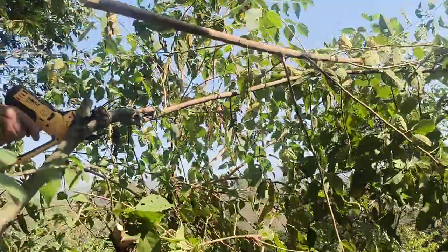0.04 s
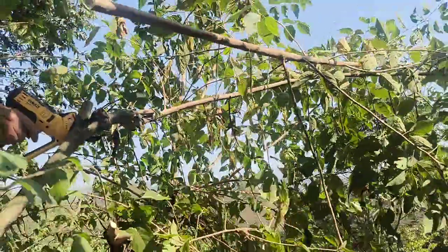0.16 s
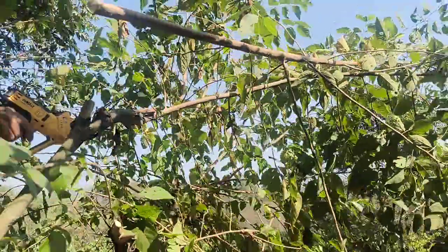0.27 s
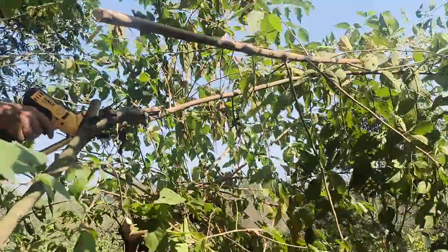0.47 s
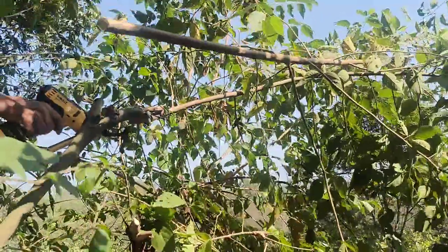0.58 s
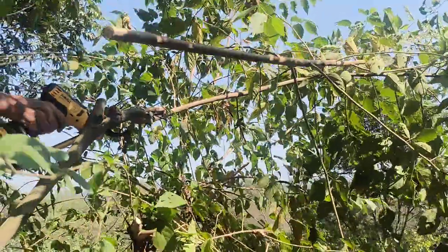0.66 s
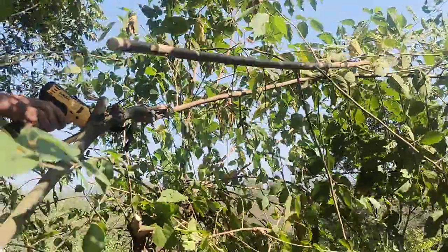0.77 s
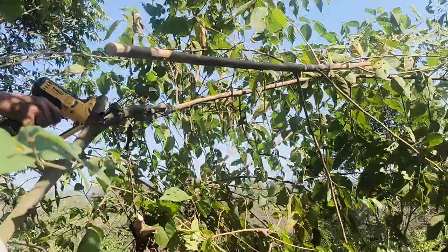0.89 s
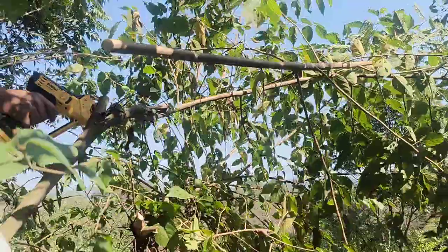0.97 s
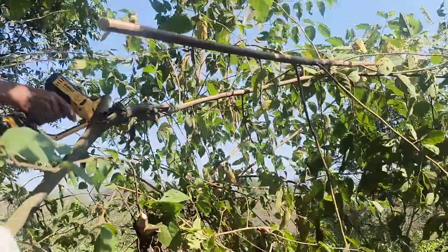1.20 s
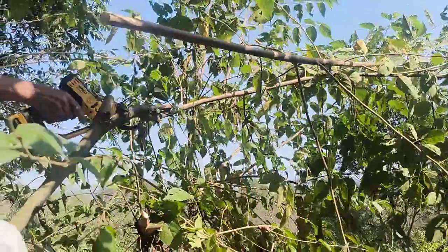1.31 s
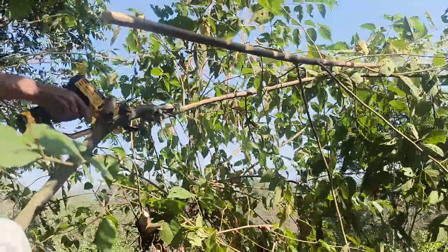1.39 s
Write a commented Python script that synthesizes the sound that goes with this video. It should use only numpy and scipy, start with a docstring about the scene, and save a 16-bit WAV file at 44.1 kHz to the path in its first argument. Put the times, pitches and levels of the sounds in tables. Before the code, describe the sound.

Battery pruning shears whir close by in quiet outdoor air, first fast and ending in a clack, then slower and buzzier. Before that, leaves rustle, a loud crunch rubs the microphone's right side, and a twig snaps among small clicks.

```python
"""A cordless pruner works on a thin branch among leaves, close to a hand-held camera.
First leaves rustle over quiet outdoor air, with a faint whine. Then something scrapes over the
right microphone opening with a loud crunch. A few small clicks follow, and a twig snaps.
Last, the geared motor whirs twice: it spins up, brakes with a clack, and runs again more slowly."""
import sys
import numpy as np
from scipy.fft import rfft, irfft, next_fast_len
from scipy.io import wavfile
from scipy.ndimage import uniform_filter1d, map_coordinates

SR = 44100
rng = np.random.default_rng(int(sys.argv[2]) if len(sys.argv) > 2 else 0)


def pcm_store(signal):
    """Save signal as 16-bit PCM."""
    levels = np.round(np.clip(np.atleast_2d(signal), -1, 1) * 32767)
    wavfile.write(sys.argv[1], SR, levels.astype(np.int16).T)


N = 63945
TOP_HZ = 15800  # the highest pitch the camera keeps


def amp(db):
    return 10 ** (np.asarray(db) / 20)


def unit(x):
    return x / np.sqrt(np.mean(x ** 2) + 1e-20)


def along(points, hz):
    """Read between the rows of a (pitch_hz, value) table, on a log pitch scale."""
    pitches, values = np.transpose(points)
    return np.interp(np.log(hz + 1), np.log(pitches + 1), values)


def curves(rows):
    """A gate that is open from the first row to the last, then each column as a curve in time."""
    times, *columns = np.transpose(rows)
    t = np.arange(N) / SR
    gate = uniform_filter1d(((t >= times[0]) & (t <= times[-1])) * 1., size=200)
    return [gate] + [np.interp(t, times, column) for column in columns]


def wobble(rate):
    """A smooth curve through `rate` random values a second."""
    return map_coordinates(rng.standard_normal(int(N * rate / SR) + 4), [np.arange(N) * rate / SR])


def filtered(x, response):
    """Multiply each frequency in x by response(hz)."""
    size = next_fast_len(N + SR // 2)
    return irfft(rfft(x, size) * response(np.fft.rfftfreq(size, 1 / SR)), size)[..., :N]


def coloured(x, spectrum):
    """Shape x with a (pitch_hz, level_db) table, then set its average (rms) level to 1."""
    return unit(filtered(x, lambda hz: amp(along(spectrum, hz))))


def sides(db):
    """Left and right gains that make the left louder by db."""
    return amp(np.array([np.atleast_1d(db), -np.atleast_1d(db)]) / 2)


def arrive(x, lead_s):
    """One sound at both microphones, the left earlier by lead_s."""
    return filtered(x, lambda hz: np.exp(1j * np.pi * hz * lead_s * np.array([[1], [-1]])))


def grains(rate, spread_db, hiss_db):
    """Tiny slips of random size, `rate` a second, over a hiss; each side has its own."""
    signs = (rng.random((2, N)) < rate / SR) * rng.choice([-1, 1], (2, N))
    sizes = amp(spread_db * np.minimum(rng.exponential(size=(2, N)), np.pi))
    return unit(signs * sizes) + amp(hiss_db) * rng.standard_normal((2, N))


def knock(start_s, fade_s, gain, size=8192):
    """A hit with a rattle that falls 60 dB in fade_s, shaped by gain(hz); peak 1 on each side."""
    t = np.arange(size) / SR
    # build a filter that rings only after the hit, never before
    cepstrum = irfft(np.log(np.maximum(gain(np.fft.rfftfreq(size, 1 / SR)), 1e-6)))
    cepstrum[1:size // 2] *= 2
    cepstrum[size // 2 + 1:] = 0
    push = rng.standard_normal((2, size)) * np.exp(-np.log(1000) * t / fade_s)
    push[:, 0] += 7  # the hit itself
    ring = irfft(rfft(push) * np.exp(rfft(cepstrum)))
    ring /= abs(ring).max(axis=1, keepdims=True)
    return np.pad(ring, ((0, 0), (round(start_s * SR), N)))[:, :N]


# Tone colour of the air: pitch_hz, level_db
AIR_COLOUR = [(25, 0.5), (60, -2.5), (200, -10), (470, -18), (800, -5.5), (1400, -12), (3000, -3),
              (6000, -11), (8500, -18), (16000, -25)]
def outdoor_air():
    """A quiet, steady hush, partly the same in both ears."""
    return amp(-56) * coloured(rng.standard_normal((2, N)) + 0.62 * rng.standard_normal(N), AIR_COLOUR)


# Path of the whine: time_s, pitch_hz, level_db
WHINE_PATH = [(.02, 2400, -65), (.14, 3370, -52), (.16, 3424, -46), (.19, 3430, -45.5), (.22, 2970, -57)]
def faint_whine():
    """A thin, unsteady whine rises and sags before the crunch."""
    gate, hz, db = curves(WHINE_PATH)
    level = gate * amp(db + 3.2 * wobble(121.0))
    phase = 2 * np.pi * np.cumsum(hz * (1 + 0.038 * wobble(593))) / SR
    return level * np.sqrt(2) * np.sin(phase)


# Loudness of the rustle: time_s, level_db, right_extra_db
RUSTLE_LEVELS = [(0, -49.5, 0), (.02, -42.5, 2), (.04, -50.5, 3.5), (.1, -46.5, 4), (.18, -44.5, 7),
                 (.28, -40, 13.5), (.35, -41, 3.5), (.39, -38, 1), (.402, -32, 3), (.44, -40, 5.5),
                 (.48, -43.5, 4), (.51, -50, -0.5), (.55, -54, -3), (.565, -41, -4), (.605, -51.5, -3),
                 (.635, -40, -3.5), (.68, -55.5, -2), (.75, -69, 3), (.8, -40, 2)]
# Tone colour of the leaves: pitch_hz, level_db
LEAF_COLOUR = [(100, -37), (400, -13), (700, -12.5), (1100, -1.5), (2000, 2), (3200, 0.5), (3900, -10),
               (5300, -1), (6100, -8), (7100, -11), (8400, -20.5), (10300, -18.5), (11400, -12.5),
               (12500, -17.5), (16000, -20.5)]
# How that colour changes on the right: pitch_hz, right_extra_db
LEAF_RIGHT_COLOUR = [(200, 14), (1200, -9), (3000, -0.5), (4100, 6.5), (5400, -6.5), (8000, -3.5),
                     (12500, -2.5)]
def foliage():
    """Leaves and bark slide over each other in small clumps of slips."""
    def slips():
        clumps = grains(rate=2500, spread_db=4.5, hiss_db=-3.0) * amp(1.54 * wobble(130.5))
        return coloured(clumps, LEAF_COLOUR)
    gate, db, right_db = curves(RUSTLE_LEVELS)
    shared = arrive(slips()[0], lead_s=-0.000323)  # reaches the right side first
    left, right = np.sqrt(0.3) * shared + np.sqrt(0.7) * slips()
    right = filtered(right, lambda hz: amp(along(LEAF_RIGHT_COLOUR, hz)))
    return gate * amp(db) * np.array([left, right * amp(right_db)])


# Loudness of the scrape: time_s, level_db
SCRAPE_LEVELS = [(.185, -59), (.216, -28), (.229, -16.5), (.245, -19.5), (.262, -14.5), (.29, -14.5),
                 (.315, -15.5), (.328, -21.5), (.345, -43), (.385, -46), (.398, -33.5), (.51, -49)]
# Tone colour of the scrape: pitch_hz, level_db
SCRAPE_COLOUR = [(18, -48), (30, -9.5), (134, -4.5), (230, -9), (480, -4.5), (900, -3.5), (1460, -7.5),
                 (3140, -3.5), (5450, -15.5), (7670, -36.5), (11700, -25), (16000, -34.5)]
# Soft bumps on the microphone: start_s, peak_db, fade_s
MIC_BUMPS = [(0.054, -32.5, 0.025), (0.208, -26, 0.033), (.227, -19.5, 0.055), (0.264, -15, 0.034),
             (.361, -37, 0.065), (0.391, -20, 0.089)]
# Tone colour of a bump: pitch_hz, level_db
BUMP_COLOUR = [(20, -10.5), (140, -6), (350, -16.5), (800, -23), (5000, -63)]
def microphone_scrape():
    """Something rubs and bumps on the right microphone opening; the left barely hears it."""
    gate, db = curves(SCRAPE_LEVELS)
    slips = grains(rate=4000, spread_db=2.2, hiss_db=-2)[1] * amp(wobble(204.3))
    crunch = gate * amp(db) * coloured(slips, SCRAPE_COLOUR)
    bumps = sum(amp(peak_db) * knock(start_s, fade_s, lambda hz: amp(along(BUMP_COLOUR, hz)))[1]
                for start_s, peak_db, fade_s in MIC_BUMPS)
    return (crunch + bumps) * np.array([[amp(-45)], [1]])


# Twig, trigger and gear clicks: start_s, peak_db, pitch_hz, width_octaves, fade_s, left_extra_db
CLICK_HITS = [(0.3732, -27.5, 1870, 0.57, 0.017, 0), (.392, -22.5, 2700, 0.48, 0.045, -5),
              (0.5552, -27, 2740, 0.51, 0.029, 3), (.616, -33.5, 933, 0.46, 0.0091, 6),
              (.7655, -34, 2710, 0.54, 0.0015, 23), (.7815, -26, 820, 0.45, 0.032, 2.5),
              (1.0165, -18, 4970, 0.58, 0.02, 6), (1.028, -19, 2880, 1.05, 0.12, 1.5)]
def clicks():
    """Each click rings briefly in a broad band around its pitch."""
    sound = np.zeros((2, N))
    for start_s, peak_db, pitch_hz, width, fade_s, left_db in CLICK_HITS:
        band = lambda hz: (1 + (np.log2((hz + 1) / pitch_hz) / width) ** 2) ** -1.4
        sound += amp(peak_db) * sides(left_db) * knock(start_s, fade_s, band)
    return sound


def twig_snap(treble_hz=7000):
    """One twig breaks with a crisp, high crack."""
    treble = lambda hz: hz ** 2 / (hz ** 2 + treble_hz ** 2)
    return amp(-27.5) * knock(start_s=0.5558, fade_s=0.055, gain=treble)


def drive_tone(run, pitch_hz=4020):
    """At part speed the motor's drive chops its current and sings at one steady pitch."""
    gate, _, level_db = curves(run)
    return gate * amp(level_db - 11) * np.sqrt(2) * np.sin(2 * np.pi * pitch_hz * np.arange(N) / SR)


# Low ring of the gearbox: pitch_hz, level_db
GEARBOX_COLOUR = [(280, -28.5), (520, -1.5), (860, 1.5), (1120, 2.5), (2000, -38)]
def chirp_and_growl(speed, angle, acceleration, slack_hz=167):
    """The gears chirp at three times the motor speed; below slack_hz they run loose and growl."""
    push_db = np.where(acceleration > 0, 0.5, -1)  # speeding up, or braking
    chatter_db = 3 * wobble(250)
    chirp = np.sqrt(2) * amp(push_db + along(GEARBOX_COLOUR, 3 * speed) + chatter_db) * np.sin(3 * angle)
    growl = amp(5) / (1 + (speed / slack_hz) ** 4) * coloured(rng.standard_normal(N), GEARBOX_COLOUR)
    return chirp, growl


# Tone colour of the pruner's shell: pitch_hz, level_db
SHELL_COLOUR = [(100, -46), (310, -27), (422, -24), (745, -8.5), (1290, -4.5), (1420, -8.5), (2310, -6.5),
                (2760, -15.5), (2980, -8), (4080, -8), (4760, -7), (6140, -9), (7770, -24), (10400, -13.5),
                (16000, -20)]
# Treble taken from the hiss and given twice over to the buzz: pitch_hz, shift_db
BUZZY_TREBLE = [(3000, 0), (9000, 3.5)]
def gear_buzz(speed, angle):
    """A buzz that repeats with each turn of the motor, coloured by the shell."""
    buzz = np.zeros(N)
    for multiple in range(2, 64):
        hz = multiple * speed
        db = along(SHELL_COLOUR, hz) + 2 * along(BUZZY_TREBLE, hz) + 2 * np.log2(multiple / 20)
        buzz += amp(db) * (hz < TOP_HZ) * np.sin(multiple * angle + rng.uniform(0, 2 * np.pi))
    return unit(buzz)


def gear_hiss(angle):
    """The gears hiss in pulses, once and three times a turn."""
    pulsing = 1 + 0.1 * np.cos(angle) + 0.31 * np.cos(3 * angle)
    darker = [(hz, db - along(BUZZY_TREBLE, hz)) for hz, db in SHELL_COLOUR]
    slips = grains(rate=4200, spread_db=2.5, hiss_db=1.0)
    return amp(1.5) * coloured(slips * pulsing, darker) / np.sqrt(2)


def gear_tones(speed, angle, tones, ring_hz=3830, width_hz=260):
    """Clear tones follow the motor; each swells as it crosses the pitch where the shell rings."""
    sound = np.zeros(N)
    for multiple, db in tones:
        swell_db = 8 / (1 + ((multiple * speed - ring_hz) / width_hz) ** 2)
        level = amp(db + swell_db + wobble(35.04))
        sound += level * np.sin(multiple * angle + rng.uniform(0, 2 * np.pi))
    return np.sqrt(2) * sound


# How far the motor's sound leans to the left: pitch_hz, left_extra_db
MOTOR_BALANCE = [(300, 2.5), (800, 1.5), (1200, 6), (2000, -2), (3300, 4), (4700, 5.5), (6200, 7.5),
                 (9000, 2), (14000, -2)]
def motor(run, tones, buzz_db, strain_hz_per_s=2400, low_cut_hz=330):
    """One run of the geared motor; tones and buzz give way to a low chirp as it speeds up or brakes."""
    gate, speed, level_db = curves(run)
    angle = 2 * np.pi * np.cumsum(speed * (1 + .001 * wobble(100))) / SR
    acceleration = uniform_filter1d(np.gradient(speed) * SR, size=400)
    strain = np.tanh(acceleration / strain_hz_per_s) ** 2  # 0 at steady speed, up to 1
    whir = gear_tones(speed, angle, tones) + amp(buzz_db) * gear_buzz(speed, angle)
    chirp, growl = chirp_and_growl(speed, angle, acceleration)
    gears = (1 - strain) ** 2 * whir + strain * chirp + growl
    # the small shell gives off little bass
    gears = filtered(gears, lambda hz: 1 - 1 / (1 + (hz / low_cut_hz) ** 10))
    direct = arrive(gears + gear_hiss(angle)[0], lead_s=0.000295)
    sound = gate * amp(level_db) * (direct + gear_hiss(angle))
    return filtered(sound, lambda hz: sides(along(MOTOR_BALANCE, hz)))


# The motor's two runs: time_s, speed_hz (turns a second), level_db
FAST_SPIN = [(.785, 90, -51), (.8, 135, -46), (.828, 248, -41), (.85, 290.4, -41), (.868, 307.5, -38.5),
             (.9, 332, -39.5), (.925, 341, -36), (.955, 350, -38), (1.015, 351, -35.5), (1.028, 338, -32.5),
             (1.044, 240, -35.5), (1.058, 148, -41), (1.088, 110, -53)]
SLOW_SPIN = [(1.145, 80, -56), (1.17, 130, -47.5), (1.182, 186, -44), (1.196, 240, -43),
             (1.225, 244, -42.5), (1.33, 251.7, -41.7), (1.45, 257, -39.7)]
# Pitches of each run's gear tones: multiple_of_speed
FAST_MULTIPLES = [1, 3, 9, 12, 15, 21, 24, 30]
SLOW_MULTIPLES = [3, 9, 12, 13, 15, 21, 24, 41]
# Strength of those tones within the run: level_db
FAST_LEVELS = [-14, -11, -10, -6, -8.5, -20, -21, -22]
SLOW_LEVELS = [-9.5, -8.5, -5.5, -15, -16, -3.5, -8.5, -23]
def pruner():
    """The motor runs fast and brakes, then runs slower with more buzz and a steady high tone."""
    fast = motor(FAST_SPIN, zip(FAST_MULTIPLES, FAST_LEVELS), buzz_db=-24)
    slow = motor(SLOW_SPIN, zip(SLOW_MULTIPLES, SLOW_LEVELS), buzz_db=-3.5)
    return fast + slow + drive_tone(SLOW_SPIN)


def scene():
    """The pruner, with air, leaves and handling noises around it."""
    return (pruner() + outdoor_air() + faint_whine() + foliage() + microphone_scrape()
            + clicks() + twig_snap())


def record(dry):
    """The camera keeps nothing above TOP_HZ."""
    return filtered(dry, lambda hz: hz < TOP_HZ)


dry = scene()
out = record(dry)
pcm_store(out)
```